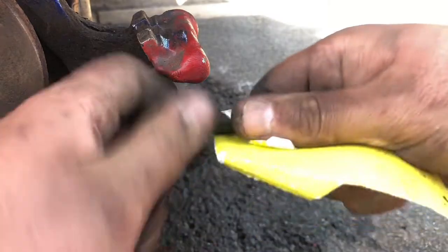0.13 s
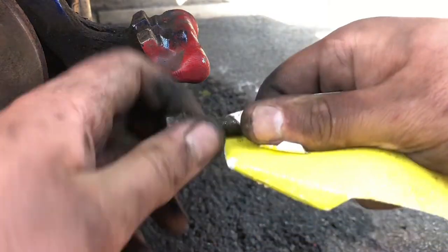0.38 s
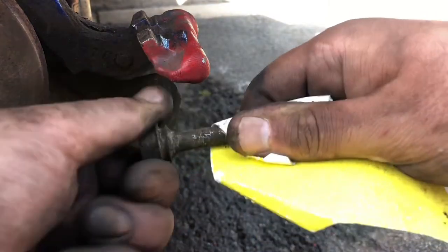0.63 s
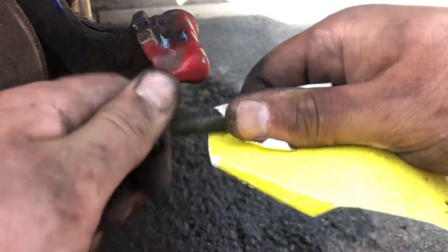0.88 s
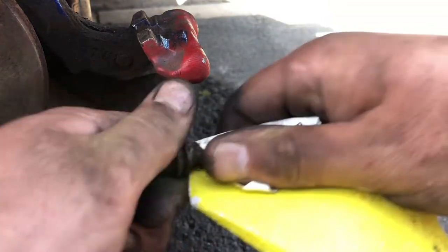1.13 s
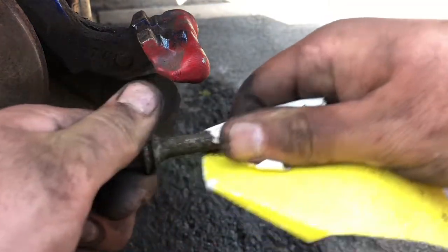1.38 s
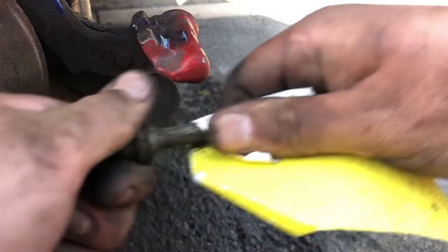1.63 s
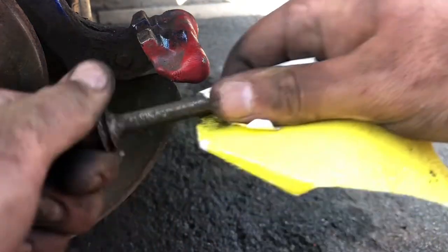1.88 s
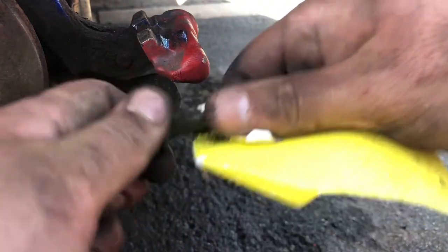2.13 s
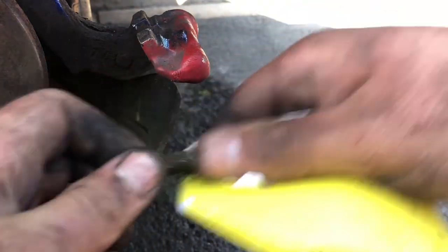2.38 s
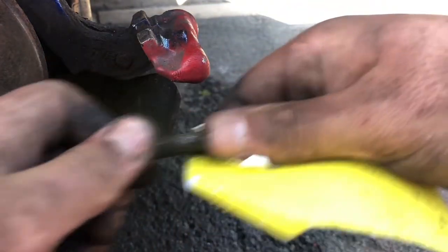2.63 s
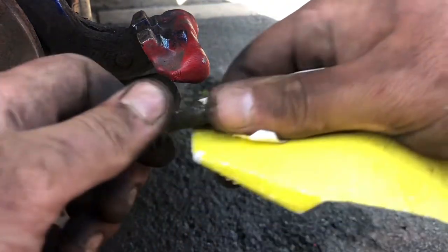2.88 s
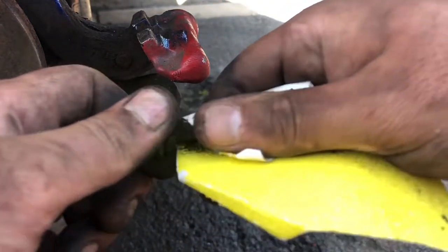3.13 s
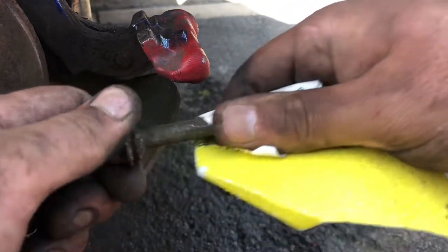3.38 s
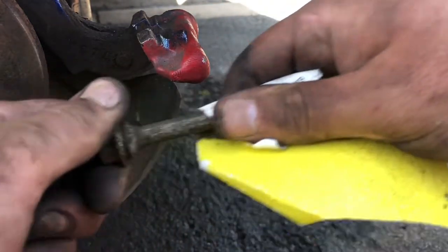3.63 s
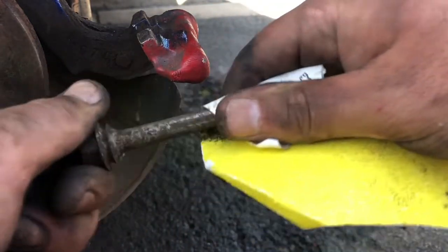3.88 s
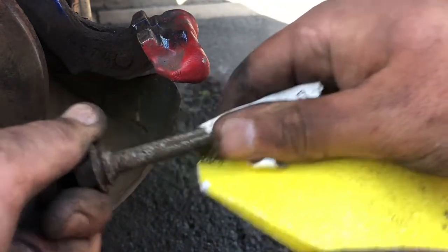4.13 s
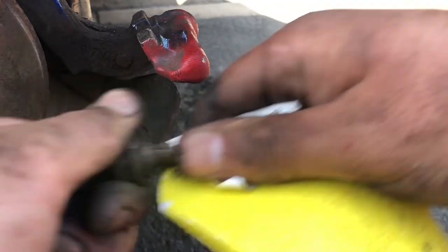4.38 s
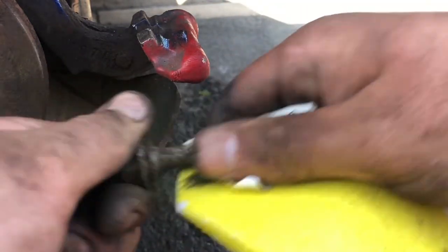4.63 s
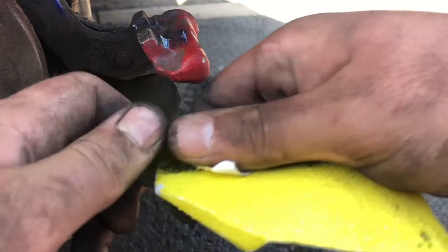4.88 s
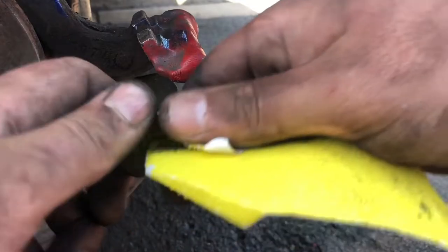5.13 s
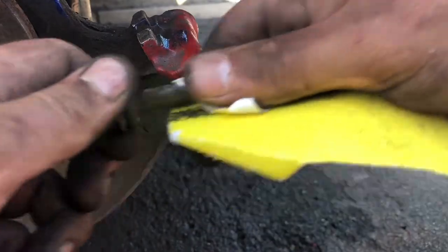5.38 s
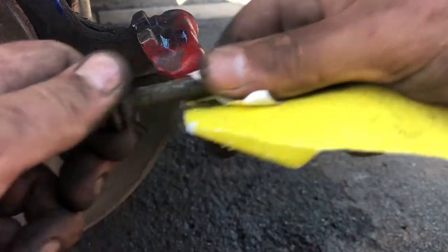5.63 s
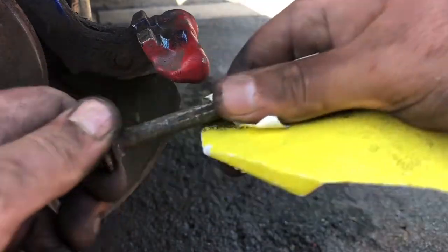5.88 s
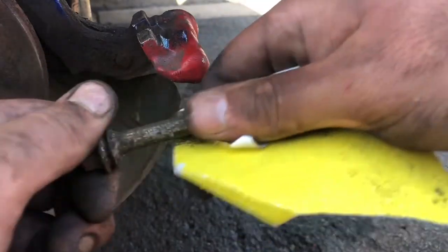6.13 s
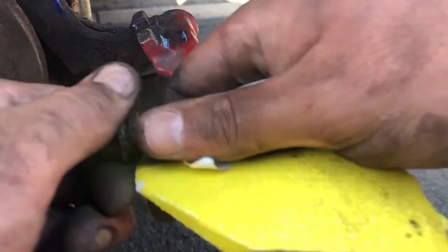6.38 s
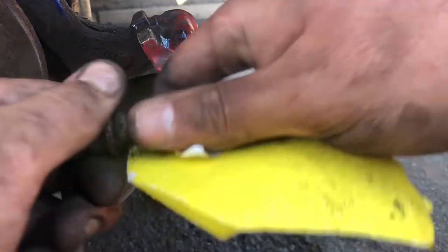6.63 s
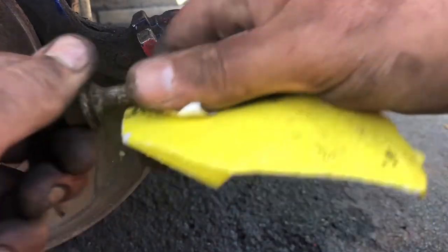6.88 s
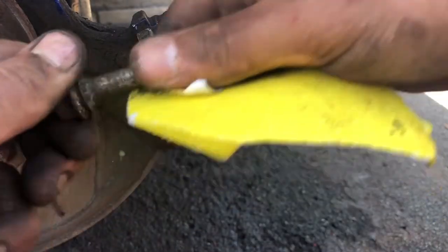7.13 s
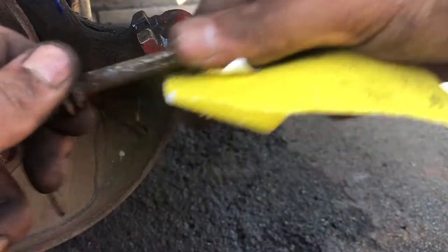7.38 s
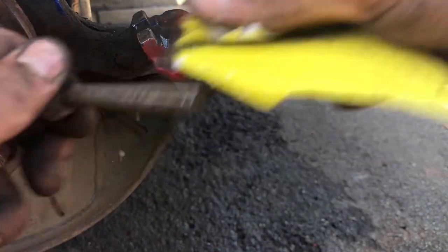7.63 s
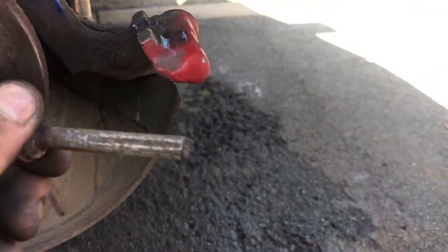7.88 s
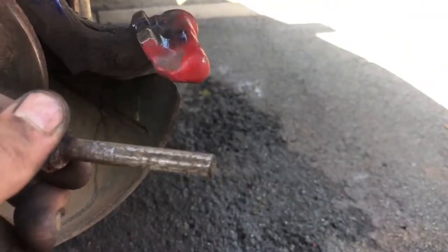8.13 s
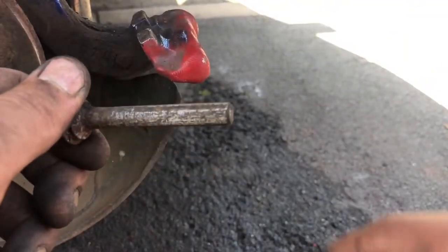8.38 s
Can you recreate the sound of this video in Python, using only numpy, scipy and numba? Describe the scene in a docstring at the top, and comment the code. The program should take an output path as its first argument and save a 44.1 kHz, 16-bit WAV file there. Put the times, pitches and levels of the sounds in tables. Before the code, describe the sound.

Gritty rapid sanding on metal, about nine strokes a second, crackling stiff paper, then a pull-off, light taps and rustle in a quiet outdoor space.

```python
"""Quick harsh scrubbing comes first: a hand rubs a steel pin in folded sandpaper, about nine strokes a second.
Random grit clicks make the hiss and excite resonances: the hand cavity below 2 kHz, the sheet above it. Stiff
paper snaps as short damped modes, mostly near the turns; then, after a last short rub, the sheet is pulled off
and laid down as taps with rustle. A low wind gust and thumps are decaying sines with noise; distant traffic is
shaped noise and a drone. One microphone feeds two equal channels."""
import sys
import numpy as np
from scipy import signal
from scipy.fft import rfft, irfft, next_fast_len
from scipy.io import wavfile
from numba import njit

SR = 44100
rng = np.random.default_rng(int(sys.argv[2]) if len(sys.argv) > 2 else 0)


def file_out(sig):
    """Save sig as 16-bit WAV at sys.argv[1]."""
    # one column per channel
    cols = np.atleast_2d(sig).T
    # limit, then scale
    lim = np.clip(cols, -1, 1)
    pcm = np.round(lim * 32767).astype(np.int16)
    wavfile.write(sys.argv[1], SR, pcm)


def attenuation_scalar(level_db):
    """Turn a level in dB into a linear amplitude multiplier (20 dB per decade)."""
    decades = np.asarray(level_db, float) / 20
    return 10 ** decades


N = 375291

# strokes, push and pull in turn: start t/s, end t/s, relative middle level/dB, lean level/dB (end over start)
STROKES = [(0.0, 0.049, -21.5, -9.5), (0.053, 0.076, -32.5, -15), (0.145, 0.274, -22.5, -6),
           (0.289, 0.318, -42, 0), (0.338, 0.439, -22, 1), (0.503, 0.616, -22.5, -5.5),
           (0.643, 0.829, -27.5, 2.5), (0.883, 1.015, -30, -1), (1.066, 1.126, -17.5, 16.5),
           (1.183, 1.271, -20.5, 7.5), (1.297, 1.335, -34.5, 3.5), (1.424, 1.476, -23, -1),
           (1.507, 1.569, -15, 11), (1.617, 1.7, -18.5, 1.5), (1.735, 1.775, -16, 8),
           (1.83, 1.924, -17.5, 6.5), (1.963, 2.04, -13.5, 0.5), (2.066, 2.135, -22.5, 4),
           (2.181, 2.219, -21, 2.5), (2.264, 2.371, -23, 11), (2.396, 2.456, -18, 6),
           (2.511, 2.596, -19, 0), (2.628, 2.692, -15.5, 11.5), (2.737, 2.828, -16.5, -1.5),
           (2.851, 2.932, -17, 0.5), (2.968, 3.035, -22, -4), (3.066, 3.126, -13.5, 6.5),
           (3.174, 3.256, -16, 0.7), (3.303, 3.353, -18.5, -5.5), (3.418, 3.468, -18.5, 2.5),
           (3.508, 3.569, -14, 1.2), (3.612, 3.691, -15, 1.5), (3.729, 3.808, -14.5, 3.5),
           (3.844, 3.917, -16, -2.5), (3.963, 4.037, -19.5, -11), (4.068, 4.128, -19, 1.5),
           (4.16, 4.232, -12.5, 2), (4.274, 4.36, -14.5, -3), (4.38, 4.444, -12, 7.5),
           (4.492, 4.583, -15, 1), (4.615, 4.684, -12.5, 1.5), (4.717, 4.798, -20.5, 7),
           (4.838, 4.9, -16.5, -1), (4.938, 5.03, -19.5, 10), (5.068, 5.137, -15.5, 8),
           (5.188, 5.265, -16.5, -5), (5.295, 5.358, -15, 9), (5.404, 5.486, -16, 0),
           (5.515, 5.58, -13.5, -1), (5.621, 5.698, -16.5, -1), (5.732, 5.797, -14.5, 2),
           (5.837, 5.915, -17.5, -1), (5.951, 6.022, -15, -3.5), (6.069, 6.12, -20.5, -2),
           (6.163, 6.209, -15.5, 1.5), (6.26, 6.324, -14.5, -8.5), (6.355, 6.418, -13, 1.5),
           (6.464, 6.546, -15.5, -1.5), (6.572, 6.644, -13, 5), (6.686, 6.767, -15.5, 0.5),
           (6.805, 6.882, -14.5, 4.5), (6.933, 7.014, -15, -4), (7.04, 7.11, -15, 0.5),
           (7.143, 7.239, -20, 11), (7.282, 7.347, -15.5, -5), (7.384, 7.458, -17.5, 7.5)]
# spectrum of grains on steel: f/Hz, relative level per Hz/dB
GRIT_SPECTRUM = [(1200, -38.5), (2400, -33), (3100, -9.5), (3700, -9.5), (3950, -3.5), (4800, -4),
                 (6400, -0.5), (8000, -0.5), (10000, -5), (13500, -6), (15800, -7)]


def rms_one(x):
    """Normalisation: divides a signal by its root mean square."""
    return x / np.sqrt(np.mean(x ** 2) + 1e-20)


def in_time(rows):
    """Linear interpolation: turns the columns after t/s into sample-rate curves."""
    s, *columns = np.transpose(rows)
    return [np.interp(np.arange(N) / SR, s, c) for c in columns]


def coloured(x, spectrum):
    """Spectral weighting: multiplies the spectrum of x by a curve (f/Hz, level/dB); rms 1."""
    size = next_fast_len(N)
    hz, level_db = np.transpose(spectrum)
    log_hz = np.log(np.maximum(np.arange(size // 2 + 1) * SR / size, 1))
    gain = attenuation_scalar(np.interp(log_hz, np.log(hz), level_db))
    return rms_one(irfft(rfft(x, size) * gain, size)[:N])


def band(x, low_hz, high_hz):
    """Band limitation: a Butterworth band-pass."""
    return signal.sosfilt(signal.butter(2, [low_hz, high_hz], "band", fs=SR, output="sos"), x)


def drift(rate_hz):
    """Slow random fluctuation: white noise through a double one-pole low-pass; rms 1."""
    r = np.exp(-2 * np.pi * rate_hz / SR)
    noise = rng.standard_normal(N + SR)
    return rms_one(signal.lfilter([1], [1, -2 * r, r * r], noise)[SR:])  # the first second settles the filter


@njit
def resonance(x, angle, r):
    """Driven damped oscillator: two poles whose centre may move from sample to sample."""
    y = np.zeros(len(x))
    for i in range(2, len(x)):
        y[i] = x[i] - x[i - 2] + 2 * r * np.cos(angle[i]) * y[i - 1] - r * r * y[i - 2]
    return y


def resonate(x, hz, width_hz):
    """Resonance: x drives an oscillator at hz (number or curve), damped according to its width; rms 1."""
    angle = 2 * np.pi * hz / SR * np.ones(N)
    return rms_one(resonance(x, angle, np.exp(-np.pi * width_hz / SR)))


def struck(times, peaks_db, modes, spread_db):
    """Modal impact: each blow sets every damped mode ringing with a random strength of its own."""
    out, at = np.zeros(N), (np.asarray(times) * SR).astype(int)
    chance_db = spread_db * rng.standard_normal((len(at), len(modes)))
    for k, (hz, level_db, t60_s) in enumerate(modes):
        clicks = np.full(N, 1e-18)
        clicks[at] = attenuation_scalar(peaks_db + level_db + chance_db[:, k])
        r, w = attenuation_scalar(-60 / (t60_s * SR)), 2 * np.pi * hz / SR
        out += signal.lfilter([0, np.sin(w)], [1, -2 * r * np.cos(w), r * r], clicks)
    return out


def grains(per_s, spread_db):
    """Shot noise: random clicks of either sign with a long tail of large ones."""
    sizes = attenuation_scalar(spread_db * np.minimum(rng.exponential(1, N), 5)) * rng.choice([-1, 1], N)
    return sizes * (rng.random(N) < per_s / SR)


def pushing():
    """Alternating motion: +1 for each push, -1 for each pull."""
    return (-1.) ** np.arange(len(STROKES))


def stroke_db():
    """Amplitude envelope of friction: each stroke swells, arches and dies into the stillness of the turn."""
    # the sheet is dragged off the pin: t/s, relative level/dB
    pull_off = [(7.505, -64), (7.516, -21.5), (7.536, -15), (7.544, -31), (7.55, -8), (7.557, -29.5),
                (7.568, -14), (7.586, -23.5), (7.596, -38), (7.606, -22), (7.629, -17.5), (7.643, -20.5),
                (7.66, -22), (7.677, -48.5), (7.735, -120)]
    # turns that stay louder or fall quieter: t/s, turn loudness/dB
    turn_loudness = [(1.04, 15), (1.8, 9), (1.94, 4), (2.05, 3), (2.38, 5.5), (2.84, 4.5), (3.49, 6),
                     (3.71, 4.5), (3.93, 8.5), (4.14, 7.5), (4.70, 12.5), (4.82, 6), (5.05, 12), (5.5, 6),
                     (5.72, 4), (5.93, 6), (6.04, 9), (6.14, 10), (6.78, 4), (7.03, -2)]
    start_db, end_db = 6.5, 6.5  # drop to the outer ends of a stroke
    stop_s, go_s = 0.022, 0.0069  # longest fall into a turn and rise out of it
    arch_db_per_s = 52  # the longer the stroke, the higher its middle stands over its ends
    turn_db, still_db_per_s, push_stop_db = -12, -450, -0.5

    start, end, middle_db, lean_db = np.transpose(STROKES)
    length = end - start
    pause = np.append(start[1:], pull_off[1][0]) - end
    ends_db = middle_db - arch_db_per_s * length
    early_db, late_db = ends_db - lean_db / 2, ends_db + lean_db / 2
    # a turn lies under the strokes beside it, deeper in a long pause and after a push
    beside_db = (late_db + np.append(early_db[1:], pull_off[1][1])) / 2
    still_db = beside_db + turn_db + still_db_per_s * pause + push_stop_db * pushing()
    turn_s, loudness_db = np.transpose(turn_loudness)
    still_db += np.bincount(np.searchsorted(start, turn_s) - 1, loudness_db, len(start))

    times = [start, start + 0.15 * length, start + 0.43 * length, start + 0.89 * length, end,
             end + np.minimum(stop_s, 0.31 * pause), end + pause - np.minimum(go_s, .35 * pause)]
    levels = [early_db - start_db, early_db, middle_db, late_db, late_db - end_db, still_db, still_db]
    points = np.column_stack([np.ravel(times, "F"), np.ravel(levels, "F")])
    return in_time(np.vstack([points[:-1], pull_off]))[0]


def sanding():
    """Friction as shot noise: dense grit clicks hiss; coarser ones drive the hand cavity and the sheet."""
    # grip round the pin: t/s, cavity f/Hz, base brightness above 9 kHz level/dB,
    # free edge of the sheet level/dB re the stroke
    grip = [(0, 1655, 1.5, -11.5), (.5, 1620, 5.5, -8), (1, 1650, -3, -18), (1.6, 1830, 1.5, -18.5),
            (2.1, 1770, 1, -21), (2.6, 1855, 1, -19.5), (3.3, 1863, 1, -34), (4, 1834, 0.5, -31),
            (4.6, 1830, 0, -32), (5.2, 1887, 1, -27), (5.8, 1906, 0.5, -18), (6.4, 1885, -0.5, -24),
            (7, 1880, 2, -23), (7.47, 1930, -2.5, -25), (7.53, 1880, 3, -8), (7.7, 1910, -3, -8)]
    # finger pressure: t/s, then base levels re the stroke: hand cavity level/dB, sheet level/dB,
    # low scrub level/dB; last, scrub gained on a push and lost on a pull level/dB
    press = [(0, -5.5, -10.5, -23, 0), (.9, -8, -15, -16, -1), (1.1, -13, -15, -22.5, -5),
             (2, -12, -17.5, -19, -1), (3, -10.5, -13.5, -22.5, 1.5), (4, -11, -15, -16, 1),
             (5, -10.5, -14.5, -21, -1), (5.7, -11, -15.5, -26.5, 3), (6.1, -12.5, -11.5, -22.5, 9),
             (6.8, -9.5, -13, -21, 5), (7.47, -11.5, -11.5, -20.5, 5), (7.53, -13.5, -12, -15.5, 2),
             (7.66, -19, -6.5, -6.5, 2)]
    # resonances of the folded sheet: f/Hz, base width f/Hz (scaled below), relative level/dB
    sheet_modes = [(2444, 420, -4.5), (2730, 330, -2.5)]
    # low scrub: f/Hz, relative level per Hz/dB
    scrub_spectrum = [(350, -17.5), (600, -18), (880, -2.5), (1000, -3), (1250, -2.5), (1500, -2),
                      (2000, -25.5)]

    level_db = stroke_db()
    speed_db = level_db + 11.5  # the stroke level stands for the rubbing speed
    cavity_hz, bright_db, edge_db = in_time(grip)
    cavity_db, sheet_db, scrub_db, push_scrub_db = in_time(press)
    push, = in_time([((start + end) / 2, way) for (start, end, *_), way in zip(STROKES, pushing())])
    cavity_db = cavity_db - 0.2 * push
    sheet_db = sheet_db - 0.3 * push
    scrub_db = scrub_db + push_scrub_db * push
    catch_db = .9 * drift(45) + 1.6 * drift(130)  # the sheet grabs and lets go

    hiss = coloured(grains(20000.0, 2.9), GRIT_SPECTRUM)
    top = signal.sosfiltfilt(signal.butter(2, 9000.0, "high", fs=SR, output="sos"), hiss)
    top_gain = attenuation_scalar(bright_db + 0.12 * speed_db + 1.5 * drift(5.7))  # faster is brighter
    hiss = hiss + (top_gain - 1) * top
    # the contact patch shifts, and the colour with it
    for low_hz, high_hz in [(3800, 5200), (5200, 7000), (7000, 9500)]:
        patch = signal.butter(1, [low_hz, high_hz], "band", fs=SR, output="sos")
        hiss = hiss + (attenuation_scalar(1.58 * drift(16.3)) - 1) * signal.sosfiltfilt(patch, hiss)

    wander = attenuation_scalar(0.14 * drift(13.0))  # the hand opens and closes a little
    peak = resonate(grains(5000.0, 2.5), cavity_hz * wander, 120)
    shoulder = resonate(grains(5000.0, 2.5), 0.85 * cavity_hz * wander, 350.0)
    cavity_gain = attenuation_scalar(cavity_db - 0.19 * speed_db + 1.08 * drift(25.0))
    body = cavity_gain * rms_one(peak + 0.62 * shoulder)

    coarse = grains(5000.0, 2.05)
    for hz, width_hz, mode_db in sheet_modes:
        # two equal resonances in series, each widened
        ringing = resonate(resonate(coarse, hz, 1.57 * width_hz), hz, 1.57 * width_hz)
        body = body + attenuation_scalar(sheet_db + mode_db + 2.2 * drift(24.0)) * ringing
    free_edge = resonate(coarse, 3440, 400.0)
    body = body + attenuation_scalar(edge_db + 1.5 * drift(15.0)) * free_edge
    scrub_gain = attenuation_scalar(scrub_db + 0.057 * speed_db + 1.5 * drift(25.0))
    scrub = scrub_gain * coloured(coarse, scrub_spectrum)

    # loose grains fall less than the rubbing does, so their ticks stand out at the turns
    loose = attenuation_scalar(-41 + .45 * speed_db) * rms_one(band(grains(250.0, 5), 3500.0, 14000.0))
    return attenuation_scalar(level_db + catch_db) * (hiss + body + scrub) + loose


def snaps():
    """Buckling impulse: a crease cracks briefly with a crumbly tail; the thin sheet radiates no bass."""
    # the loud buckling creases: t/s, nominal peak level/dB
    loud_snaps = [(0.1527, -11), (0.1747, -5.5), (0.2675, -21), (0.2904, -18), (0.2984, -15.5),
                  (0.3251, -22), (0.3358, -15), (0.5064, -16), (0.6314, -26), (0.6436, -18), (0.672, -16),
                  (0.6808, -17), (0.8302, -20), (0.8584, -30), (1.0047, -21), (1.0605, -18.5), (1.171, -21),
                  (1.2971, -19), (1.301, -12), (1.3227, -20.5), (1.3333, -29), (1.3665, -32), (1.3744, -29),
                  (1.3919, -20), (1.4146, -9.5), (1.4966, -9.5), (1.7285, -8.5), (1.7445, -12),
                  (1.8179, -21), (1.8304, -21), (1.9444, -20), (1.9536, -8), (2.3921, -22), (2.403, -8),
                  (2.498, -24), (2.6214, -5), (2.8289, -10), (3.1491, -11.5), (3.2946, -8.5), (3.3502, -17),
                  (3.7116, -25), (3.8246, -15.5), (3.9316, -6.5), (3.9508, -14), (3.964, -14),
                  (4.0254, -3.5), (4.388, -4.5), (4.7011, -16), (4.839, -9), (4.888, -9), (5.5011, -21),
                  (5.7113, -22.0), (5.825, -24.5), (5.9418, -14), (6.031, -22), (7.0296, -29),
                  (7.1453, -21), (7.2776, -11), (7.5477, -10), (7.5517, -10), (7.6525, -3.5)]
    # modes of a crack: f/Hz, relative level/dB, 60 dB decay t/s
    snap_modes = [(1700, -10, .008), (4300, -34, .004), (7040, -2, 0.0024), (9800, 11.5, 0.00074),
                  (13600, -5, .002)]

    start, end = np.transpose(STROKES)[:2]
    where, strength = rng.random(len(end) - 1), rng.standard_normal(len(end) - 1)
    pause = start[1:] - end[:-1]
    # one faint snap in every turn, fainter the longer the hand rests
    tick_db = -22 - 350 * pause + 4 * strength
    ticks = np.column_stack([end[:-1] + where * pause, tick_db])
    s, peak_db = np.vstack([loud_snaps, ticks]).T
    crack = struck(s, peak_db - 4, snap_modes, spread_db=2)
    blows = np.full(N, 1e-18)
    blows[(s * SR).astype(int)] = attenuation_scalar(peak_db - 10.0)
    tail_envelope = signal.lfilter([1], [1, -attenuation_scalar(-60 / (0.014 * SR))], blows)  # 14 ms decay by 60 dB
    tail = tail_envelope * coloured(rng.standard_normal(N), GRIT_SPECTRUM)
    return band(band(crack + tail, 1300.0, 19000.0), 1300.0, 19000.0)


def laying_down():
    """Modal impacts with decaying shot noise: a last short rub, then taps, each with rustle singing at a fold."""
    # a last short rub, then taps as the sheet is laid down: t/s, nominal peak level/dB, singing f/Hz
    laid = [(7.4895, -16, 3000), (7.7434, -42, 5000), (7.8196, -28, 3500), (7.835, -29.5, 3500),
            (7.865, -39, 3000), (7.8945, -46, 3500), (7.999, -23, 4500), (8.013, -23, 5400),
            (8.021, -23, 2510), (8.0596, -10, 3470), (8.068, -32, 3040), (8.0864, -31, 1400),
            (8.1467, -15, 1650), (8.156, -28, 3730), (8.206, -31, 2000), (8.2262, -29, 3600),
            (8.2344, -37, 1700), (8.2544, -25, 2200), (8.459, -31.5, 2500)]
    # modes of a tap: f/Hz, relative level/dB, 60 dB decay t/s
    tap_modes = [(1250, -12, .015), (1650, -2.5, .015), (2720, -10, 0.0104), (3500, -3, 0.011),
                 (5400, -16, .015), (8100, -6, 0.0036)]
    # rustle: f/Hz, relative level per Hz/dB
    rustle_spectrum = [(700, -8), (1500, -5), (4000, -7), (8000, -12), (16000, -16.5)]
    # faint rustle of the loose sheet: t/s, base level/dB
    handling = [(7.66, -46), (7.794, -60), (8.5, -74)]
    rustle_t60_s = 0.058

    s, peak_db, fold_hz = np.transpose(laid)
    burst, singing_hz, t = np.zeros(N), np.full(N, fold_hz[0]), np.arange(N) / SR
    for at, top_db, hz in laid:
        i = int(at * SR)
        burst[i:i + SR // 4] += attenuation_scalar(top_db - 14.5 - 60 * (t[i:i + SR // 4] - at) / rustle_t60_s)
        singing_hz[i:] = hz
    faint_db = in_time([(7.6, -120)] + list(handling))[0]
    crumple = grains(6000.0, 3.5)
    rustle = coloured(crumple, rustle_spectrum) * (burst + attenuation_scalar(faint_db + 2.5 * drift(30.0)))
    rustle = rustle + attenuation_scalar(-4.5) * burst * resonate(crumple, singing_hz, 350.0)
    taps = struck(s, peak_db - 8, tap_modes, spread_db=2.5)
    return band(band(taps + rustle, 800.0, 18000.0), 800.0, 18000.0)


def low_bumps():
    """Damped oscillation: each bump is a low decaying sine, roughened by noise about the same pitch."""
    # low bumps, a wind gust near 5 s, then hand and sheet thumps:
    # t/s, nominal peak level/dB, final f/Hz, 60 dB decay t/s
    bumps = [(4.995, -36.5, 300, 0.37), (5.04, -36.5, 400, 0.28), (5.035, -32, 86.3, 0.52),
             (5.1, -33.5, 88.7, 0.45), (7.548, -42, 550, 0.23), (7.612, -29.5, 287, 0.16),
             (7.652, -31, 343, 0.086), (8.003, -27.5, 212, 0.12), (8.06, -31, 200, 0.12),
             (8.087, -36, 420, 0.094)]
    sag, sag_s = .3, .012  # a bump starts sharp by this share and sinks to its pitch

    out, t = np.zeros(N), np.arange(SR) / SR
    bent_t = t + sag * sag_s * (1 - np.exp(-t / sag_s))
    for at, peak_db, hz, t60_s in bumps:
        i = int(at * SR)
        fade = attenuation_scalar(peak_db - 60 * t / t60_s) * (1 - np.exp(-t / 0.0017))
        puff = rms_one(band(rng.standard_normal(SR), 0.6 * hz, 2.03 * hz))
        bump = fade * (np.sin(2 * np.pi * hz * bent_t) + 0.83 * puff)
        out[i:i + SR] += bump[:N - i]
    return out


def street():
    """Filtered noise: far traffic as a dull wash, with a lumpy rumble, an engine drone and tyre roar."""
    # base colour of the wash: f/Hz, relative level per Hz/dB
    wash_spectrum = [(25, -38), (55, -5), (85, 0), (130, -4), (200, -7.5), (300, -9), (450, -13),
                     (620, -17.5), (820, -19), (1100, -22), (1600, -32), (3500, -29), (16000, -47.5)]
    # t/s, traffic level/dB, base low rumble level/dB
    street_levels = [(0.0, -53.5, -56), (1.5, -52, -54), (1.9, -50.5, -50), (2.4, -48.5, -58.5),
                     (2.9, -49, -50), (3.6, -48.5, -48), (5.0, -46, -48.5), (5.45, -47.5, -45),
                     (6.0, -43, -50), (6.6, -40, -46), (7.0, -42.5, -46.5), (7.6, -44, -48),
                     (8.5, -48.5, -48.5)]
    # a far engine: t/s, f/Hz, level/dB
    engine = [(0, 143, -48.5), (.9, 135, -54.5), (1.2, 116, -47.5), (2, 109, -58), (3.5, 91, -52),
              (5, 80, -55), (7, 78.6, -51.5), (8.5, 80, -45.5)]
    # tyre roar near 800 Hz: t/s, level/dB
    tyre_levels = [(0, -69), (2, -59), (5, -58), (7.5, -52), (8.5, -53)]

    traffic_db, rumble_db = in_time(street_levels)
    drone_hz, drone_db = in_time(engine)
    wash = coloured(rng.standard_normal(N), wash_spectrum)
    low = coloured(wash, [(140, -2), (240, -30.5)])
    rest = coloured(wash, [(110, -26.5), (190, -12.5)])
    traffic = attenuation_scalar(traffic_db) * rest
    rumble = attenuation_scalar(rumble_db + 1.44 * drift(3.2)) * low
    drone = attenuation_scalar(drone_db) * resonate(rng.standard_normal(N), drone_hz, 10.0)
    tyres = attenuation_scalar(in_time(tyre_levels)[0]) * rms_one(band(rng.standard_normal(N), 677.0, 920.0))
    return tyres + traffic + rumble + drone


def scene():
    """Superposition and reflection: sources add up; hard ground returns a short dull echo of all but the street."""
    near = sanding() + snaps() + laying_down() + low_bumps()
    lag = int(.0035 * SR)
    echo = band(np.append(np.zeros(lag), near[:-lag]), 350.0, 6000.0)
    return np.tile(near + attenuation_scalar(-18.0) * echo + street(), (2, 1))


def roll_off(x):
    """The treble ends steeply here."""
    return signal.sosfilt(signal.butter(12, 17100, fs=SR, output="sos"), x)


def record(dry):
    """Saturation and band limitation: peaks are rounded, then the top is cut steeply."""
    rounded = .82 * np.tanh(dry / .82)
    mix = signal.sosfilt(signal.ellip(12, .3, 50, 15760, fs=SR, output="sos"), rounded)
    return roll_off(mix)


dry = scene()
out = record(dry)
file_out(out)
```